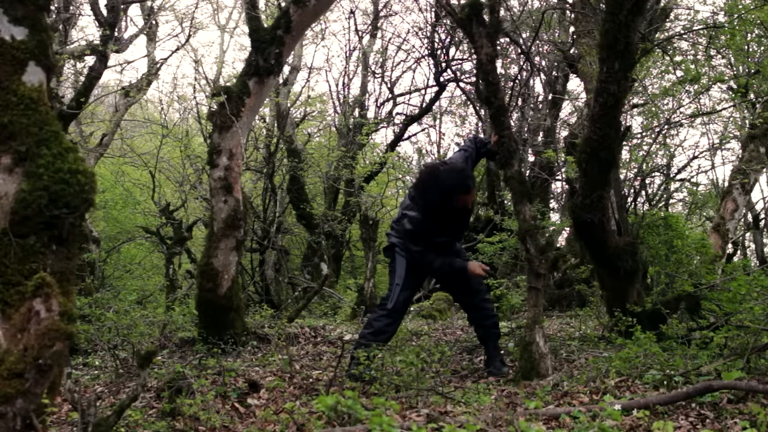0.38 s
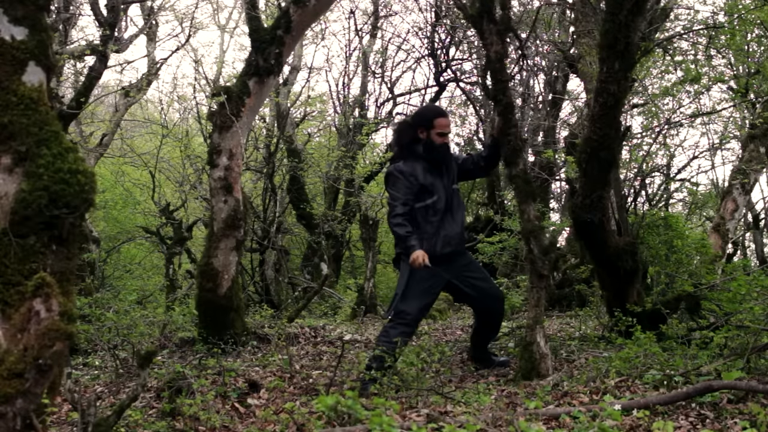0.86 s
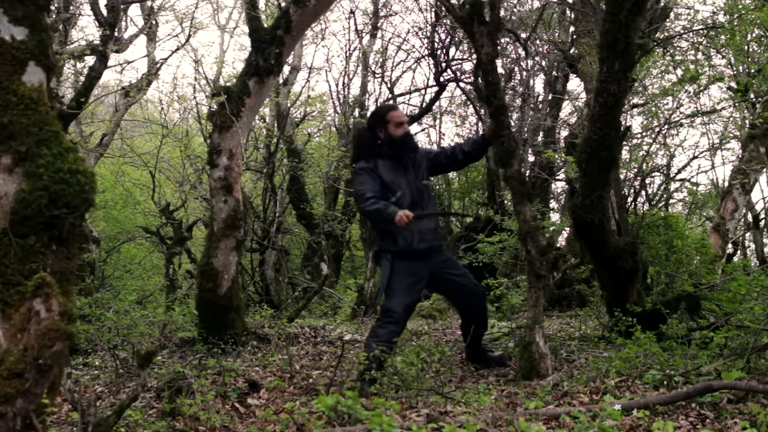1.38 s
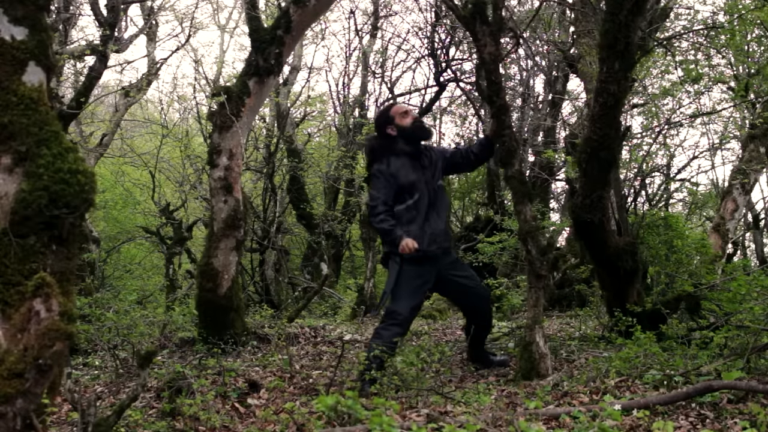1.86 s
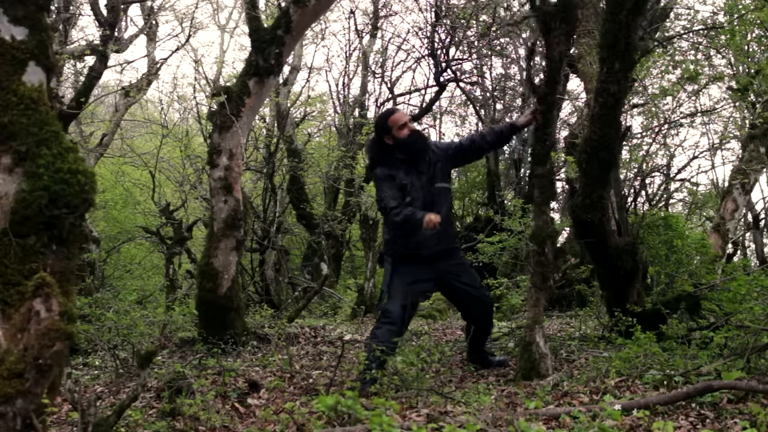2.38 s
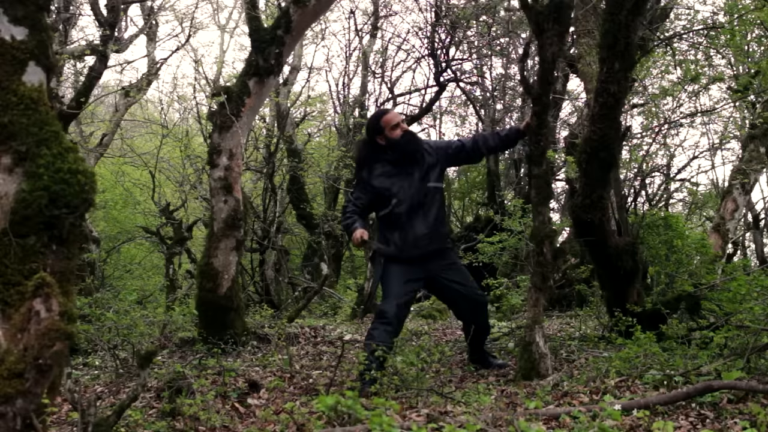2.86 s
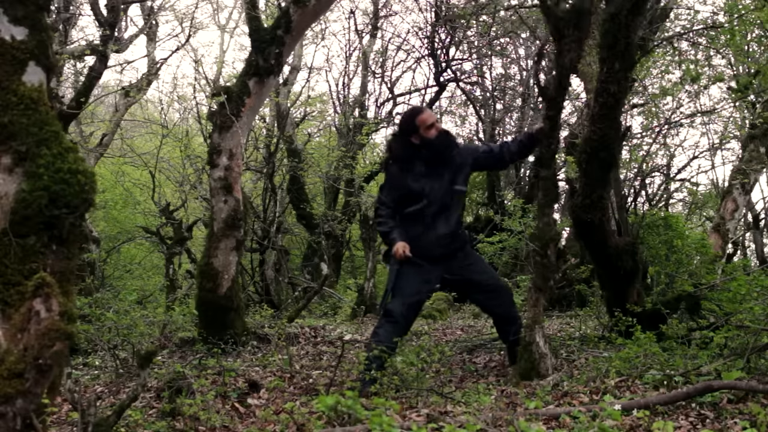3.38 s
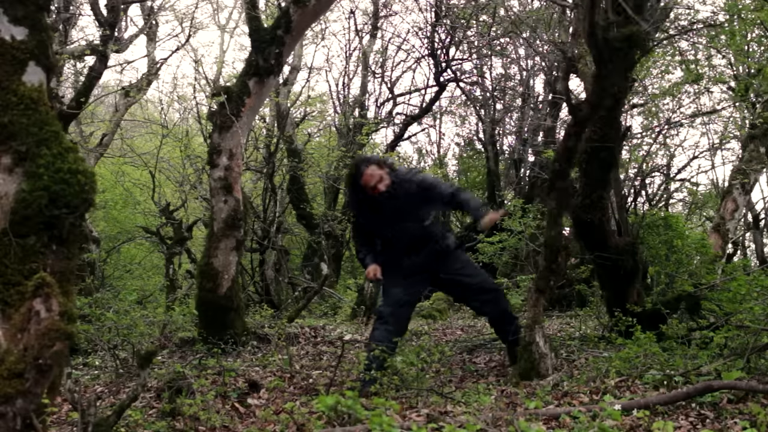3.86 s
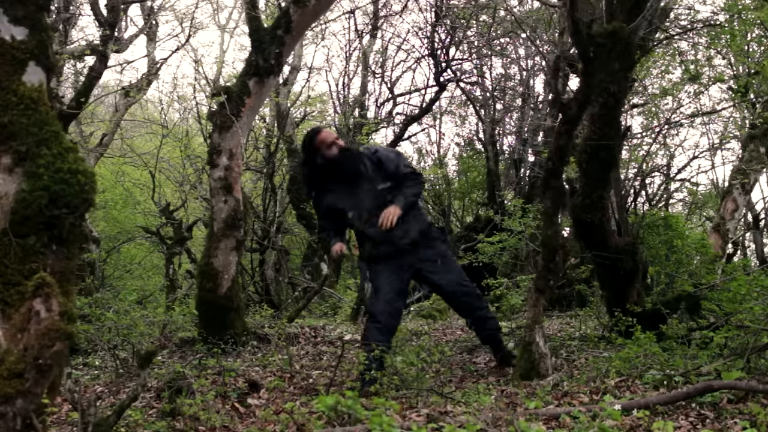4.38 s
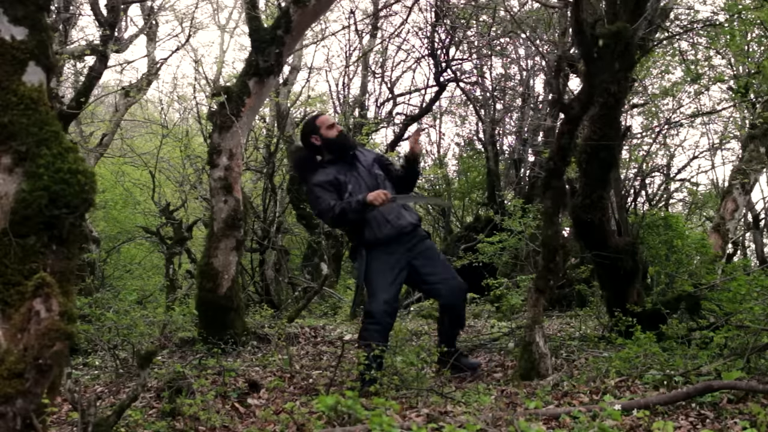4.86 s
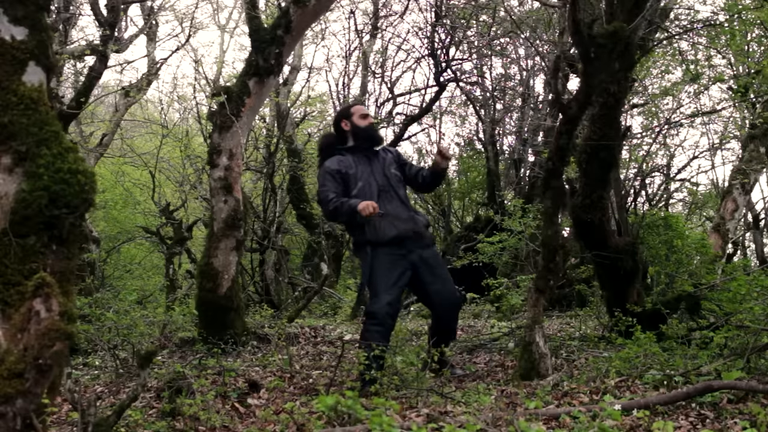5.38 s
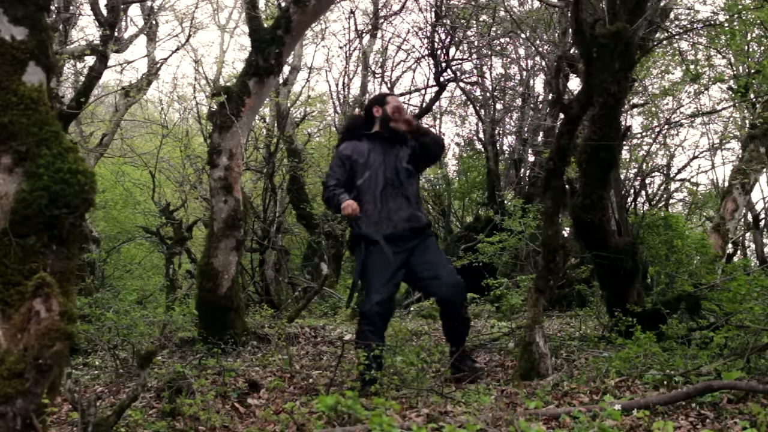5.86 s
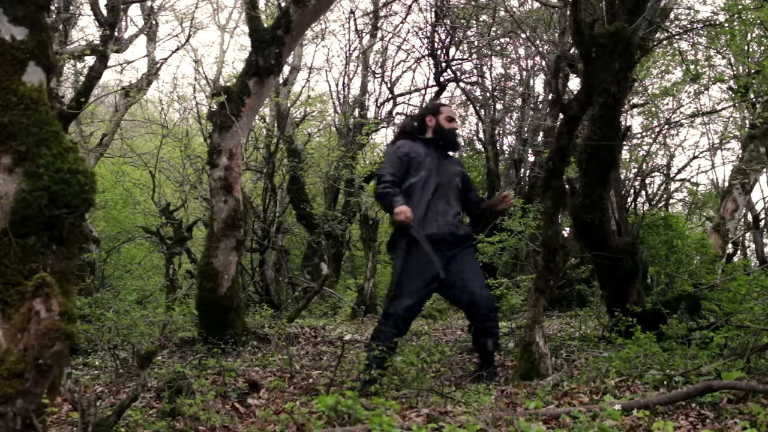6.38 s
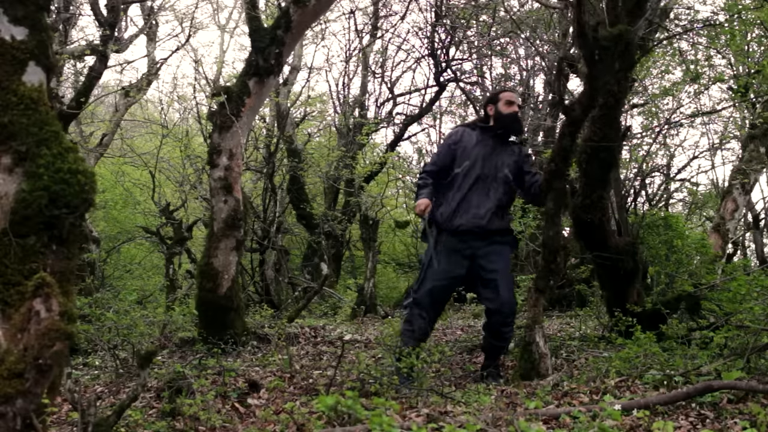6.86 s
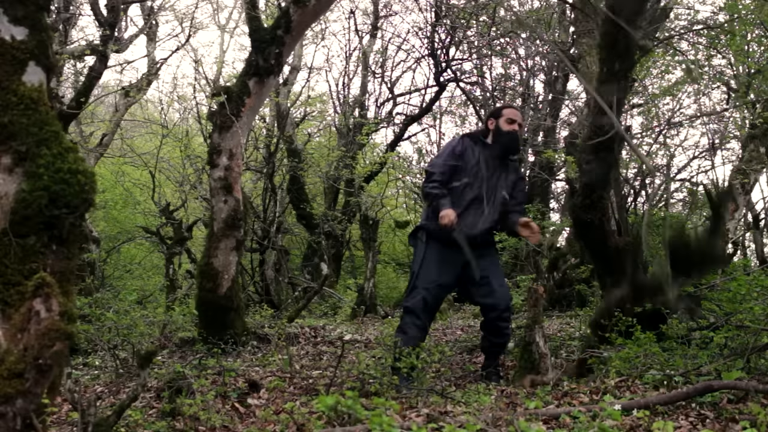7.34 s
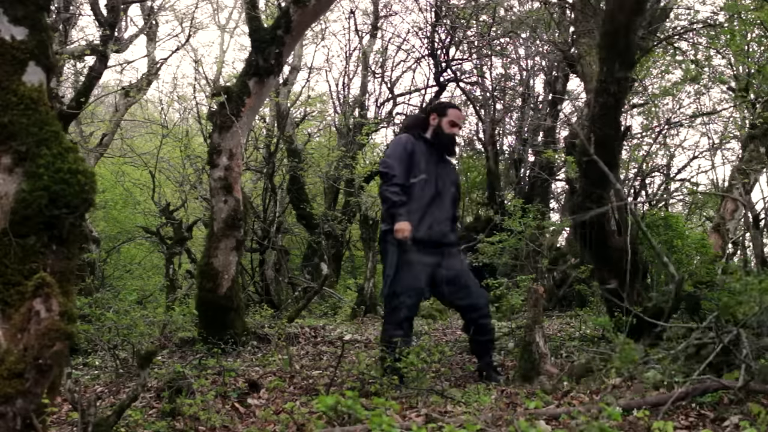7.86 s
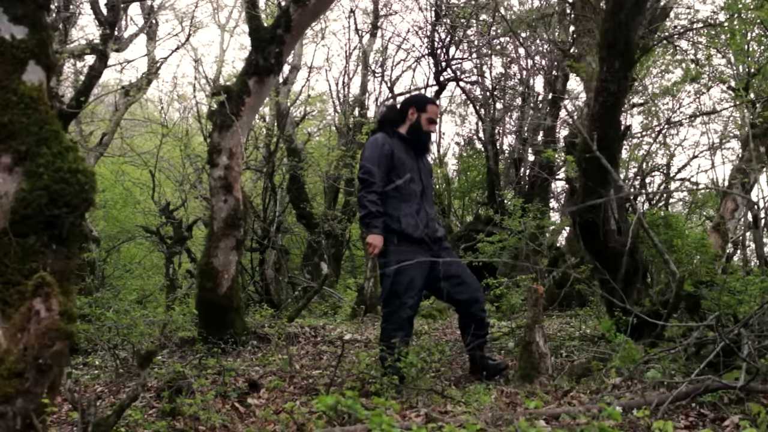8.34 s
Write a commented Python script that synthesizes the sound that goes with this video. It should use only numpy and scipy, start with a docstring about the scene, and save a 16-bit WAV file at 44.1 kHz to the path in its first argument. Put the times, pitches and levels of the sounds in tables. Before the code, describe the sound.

In a quiet wood, a small saw rasps through quick strokes and stops. A tight burst of loud dry cracks follows, then another, with twigs crackling between. After a quieter spell of faint ticks and rustling, the tree tears, snaps and falls through twigs with dull knocks. A stereo microphone stands some metres away, catching short trunk echoes.

```python
"""Felling a dead tree in a damp wood

A small hand saw finishes a cut, then a dead tree is wrenched, snaps in several goes and is pushed over.
Saw teeth are dense clicks through resonances; each break is a volley of tearing fibres and a bright spit.
Clumped grains make twig crackle and the rustle of leaves and bark; dying low noise makes thumps and knocks.
The trunks return a wash of noise echoes over a low far-off rumble; a stereo microphone stands metres away."""
import sys
import numpy as np
from scipy import signal
from scipy.io import wavfile

SR = 44100
rng = np.random.default_rng(int(sys.argv[2]) if len(sys.argv) > 2 else 0)


def dump(signal):
    """Clip the signal to [-1, 1] and save it as 16-bit WAV at the path in sys.argv[1]."""
    limited = np.clip(np.atleast_2d(signal).T, -1, 1)
    pcm = np.round(limited * 32767).astype(np.int16)
    wavfile.write(sys.argv[1], SR, pcm)


def invert_db(level):
    """Linear amplitude ratio for a level in decibels (20 dB per decade), elementwise."""
    return 10 ** (np.asarray(level, dtype=float) / 20)


N = 384993

# Breaks of the wood. Each row: start in seconds, knock level in dB, pitch of the piece in Hz,
# spit level in dB, time in seconds in which the tearing falls 60 dB.
BREAK_EVENTS = [(.9326, -37, 2240, -45, .02), (0.9524, -9.5, 1590, -27, 0.0072),
                (0.9697, -20, 1410, -13, .024), (0.9881, -11.5, 1400, -12, 0.022),
                (1.013, -3, 1170, -2, 0.03), (1.0324, -15, 1580, -16, .026), (1.0872, 2.5, 1500, 2, 0.016),
                (1.0977, -23, 1240, -3, 0.0069), (1.3461, -30.5, 1770, -26, 0.034),
                (1.402, -35, 1460, -35, 0.031), (1.5126, -26, 1360, -12.5, 0.015),
                (1.5662, -23, 2840, -32, 0.024), (1.5756, -33.5, 1040, -44, 0.06),
                (1.6238, -36.5, 2950, -31, .017), (1.679, -64, 1530, -35.5, .03),
                (1.8392, -40, 1870, -56, .039), (2.0336, -33, 2670, -31, 0.018),
                (2.04, -32, 2660, -54, .051), (2.256, -1, 1140, 3.3, 0.0092),
                (2.264, -0.5, 1650, 1, 0.0087), (2.2688, -6.5, 1740, -6, 0.036),
                (2.277, -9, 1480, -30, 0.035), (2.2838, -9.5, 1790, -23, 0.036),
                (2.2994, -11, 1740, -23, 0.053), (2.311, -6.5, 1030, -7, 0.025),
                (2.3227, -12, 1040, -10, .021), (2.3338, -11, 2090, -13, 0.01),
                (2.339, -8, 1660, -6, 0.043), (2.3744, 1.2, 1350, 1, 0.017), (2.3982, -22, 2740, -33, 0.02),
                (2.5164, -37, 1740, -20, .024), (2.616, -28, 4470, -32, .014),
                (2.651, -20, 3840, -43, 0.031), (2.7242, -33, 2050, -35, .027),
                (2.789, -32.5, 2580, -25, 0.056), (2.9536, -35, 1880, -22, 0.05),
                (2.971, -27.5, 2270, -23, 0.036), (3.03, -24, 2460, -40, 0.027),
                (3.1245, -34, 3920, -27, 0.034), (3.1965, -35, 3880, -19, 0.049),
                (3.2185, -42, 2800, -16, 0.0086), (3.2753, -31, 3940, -39, 0.018),
                (3.354, -32.5, 695, -53, 0.077), (3.4257, -7.5, 1490, -29, 0.0079),
                (3.4363, -14, 2530, -47, 0.011), (3.4834, -22.5, 1270, -35, 0.059),
                (3.584, -26, 2330, -20.5, 0.064), (3.624, -40, 3060, -13.5, .016),
                (3.638, -30, 2610, -6.5, .018), (3.6512, -15.5, 4000, -13, 0.027),
                (3.6717, -27, 1850, -13, 0.037), (3.7103, -25, 2240, -13, 0.034),
                (3.766, -24, 2610, -20, 0.046), (3.8169, -19, 1690, -32, 0.044),
                (3.827, -11.5, 1920, -12, 0.093), (3.9244, -52, 1850, -26, .017),
                (4.033, -50, 2610, -46, .017), (4.135, -43, 1720, -33, .033),
                (4.463, -35.5, 1200, -54, .031), (4.561, -65, 1590, -33, .03),
                (4.6149, -40, 3400, -29, .017), (4.65, -38, 1100, -53, 0.074),
                (4.711, -39, 1800, -52, .013), (4.979, -34.5, 3600, -45, 0.014),
                (5.0486, -33, 3060, -37, .018), (5.2732, -66, 1560, -38, .016),
                (5.3707, -41, 1840, -64, .018), (5.569, -44.5, 1460, -42, .016),
                (5.612, -30.5, 1780, -14.5, .014), (5.663, -49, 3340, -38, .025),
                (5.7973, -55, 3100, -36, .03), (5.8396, -31.5, 2690, -51, .016),
                (5.861, -32.5, 3120, -32.5, .027), (5.944, -32.5, 975, -39, 0.0092),
                (6.099, -46, 2500, -41, .044), (6.941, -44, 1690, -49, 0.023),
                (7.0006, -21.5, 3620, -17, .057), (7.1124, -19, 3010, -19, 0.16),
                (7.195, -16, 2170, -27, 0.17), (7.258, -22, 2130, -13, 0.031),
                (7.3374, -34, 1700, -19, .019), (7.356, -30, 3380, -34, .013),
                (7.4031, -19, 1050, -31, .038), (7.4205, -0.5, 1840, 0, 0.037),
                (7.4654, -17, 2600, -10, 0.066), (7.4984, -20, 1950, -24, 0.064),
                (7.5021, -12.5, 2430, -10, 0.073), (7.5207, -26, 3530, -8, .021),
                (7.5337, -12.5, 4180, -20, 0.044), (7.5977, -3.5, 2280, -21, .032),
                (7.61, -3, 3270, -17, .033), (7.626, -21, 1110, -9, 0.03), (7.6474, -8, 4100, -5, .033),
                (7.698, -12, 1940, -30, 0.026), (7.799, -23, 1500, -19, 0.042),
                (7.8178, -15, 1940, -23, 0.024), (7.964, -23.5, 2540, -23, 0.061),
                (8.073, -18, 2250, -47, 0.014), (8.21, -28.5, 3010, -22, 0.053),
                (8.259, -36, 3070, -21, 0.039), (8.3221, -27, 3160, -5.5, 0.0056),
                (8.3457, 3, 2570, -1.5, 0.024), (8.348, -6.5, 1330, -13, 0.018),
                (8.3733, -26, 564, -29, 0.013), (8.4947, -24, 580, -21, 0.038),
                (8.584, -19, 3070, -7.5, 0.043), (8.597, -12, 2770, -9, 0.024),
                (8.618, -5.5, 2360, -15, 0.019)]


def rms_one(x):
    """Scale to rms 1."""
    return x / np.sqrt(np.mean(x ** 2) + 1e-20)


def in_time(points):
    """Read a curve of (seconds, value) rows at every sample."""
    seconds, values = np.transpose(points)
    return np.interp(np.arange(N) / SR, seconds, values)


def at_hz(points, hz):
    """Read a curve of (Hz, value) rows on a log-frequency axis."""
    points_hz, values = np.transpose(points)
    return np.interp(np.log(hz), np.log(points_hz), values)


def drift(rate_hz):
    """Random wander of rms 1: noise smoothed by two equal poles at rate_hz, made at SR / 40."""
    pole = np.exp(-80 * np.pi * rate_hz / SR)
    noise = rng.standard_normal(N // 40 + 2002)
    slow = signal.lfilter([1], [1, -2 * pole, pole * pole], noise)[2000:]
    return np.interp(np.arange(N) / 40, np.arange(len(slow)), rms_one(slow))


def resonance(x, hz, width_hz):
    """Two-pole band-pass, gain about 1 on top."""
    radius = np.exp(-np.pi * width_hz / SR)
    numerator = np.array([1, 0, -1]) * (1 - radius * radius) / 2
    denominator = [1, -2 * radius * np.cos(2 * np.pi * hz / SR), radius * radius]
    return signal.lfilter(numerator, denominator, x + 1e-18)


def clicks(per_s, spread_db):
    """Clicks at random moments, most small, a few large; mean power about 1."""
    sizes = invert_db(spread_db * np.minimum(rng.exponential(1, N), 5)) * rng.choice([-1, 1], N)
    happens = rng.random(N) < per_s / SR
    return happens * rms_one(sizes) * np.sqrt(SR / per_s)


def sides(pan_db):
    """Left and right gains that differ by pan_db; above 0 favours the left."""
    return invert_db(np.array([[.5], [-.5]]) * pan_db)


def spread_stereo(mid, side, alike):
    """Two noises of equal power become left and right with the correlation alike."""
    return np.sqrt(1 + alike) * mid + np.sqrt(1 - alike) * side * [[1], [-1]]


def bands(low_hz, count):
    """Half-octave band-passes with their centres."""
    edges = low_hz * 2 ** (np.arange(count + 1) / 2)
    return [(np.sqrt(a * b), signal.butter(2, [a, b], "band", fs=SR, output="sos"))
            for a, b in zip(edges, edges[1:])]


def air(patchy_db=3.5, calm_hz=300):
    """Far rumble and faint hiss of the canopy: noise wavering band by band, steadier in the treble."""
    # Each row: frequency in Hz, relative level in dB per Hz.
    air_spectrum = [(13, -45), (22, -25), (61, -6), (115, 1), (211, -11), (356, -11.5), (510, -13.5),
                    (618, -15), (1270, -18), (2320, -23), (3150, -22.5), (7600, -25.5), (13200, -39),
                    (16000, -40)]
    # Each row: frequency in Hz, left-right correlation.
    likeness = [(30, 1), (150, 0.92), (400, 0.067), (1500, 0.23), (5000, 0.17), (14000, 0.17)]
    white = rng.standard_normal((2, 2, N + 8000))
    out = 0
    for k, (hz, sos) in enumerate(bands(20.6, count=19)):
        mid, side = signal.sosfilt(sos, white[k % 2])[:, 8000:]     # drop the filter's start
        waver_db = patchy_db * min(1, (calm_hz / hz) ** .25) * drift(9)
        gain = invert_db(at_hz(air_spectrum, hz) + waver_db)
        out = out + gain * spread_stereo(mid, side, at_hz(likeness, hz))
    return invert_db(-55.5) * rms_one(out)


def wood(x, build_s=0.0009, alike=0.68):
    """Countless trunk echoes: noise that builds up and dies band by band, partly different on each side."""
    # Each row: frequency in Hz, time in seconds in which the echoes fall 60 dB.
    echo_t60 = [(200, 0.52), (700, 0.51), (1500, 0.54), (4000, 0.62), (9000, 0.52), (15000, 0.13)]
    t = np.arange(SR) / SR
    mid_side = np.zeros((2, SR))
    for hz, sos in bands(165.0, count=13):
        noise = signal.sosfilt(sos, rng.standard_normal((2, SR)))
        mid_side += noise * invert_db(-60 * t / at_hz(echo_t60, hz))
    echoes = spread_stereo(*mid_side, alike) * (1 - np.exp(-t / build_s))
    return signal.fftconvolve(x[None], rms_one(echoes) / np.sqrt(SR), axes=1)[:, :N]


def thumps(rise_s=0.00057):
    """Dull lumpy thumps and low knocks of trunk and limbs: dying noise, twice through a wide resonance."""
    # Trunk and limbs knocking together and thumping the soft ground. Each row: start in seconds,
    # peak in dB, pitch in Hz, time in seconds in which the noise falls 60 dB.
    thump_events = [(1.015, -35.5, 128, 0.11), (1.089, -49, 138, 0.11), (2.257, -32.5, 150, 0.048),
                    (2.377, -38, 130, 0.12), (5.922, -53, 246, 0.12), (5.995, -49, 780, 0.054),
                    (6.525, -48, 775, .05), (7.403, -27.5, 171, 0.077), (7.2, -27, 645, 0.19),
                    (7.25, -29.5, 530, 0.035), (7.59, -28.5, 260, 0.17), (7.61, -35, 130, 0.23),
                    (7.68, -30.5, 620, 0.064), (8.06, -46, 96, 1), (8.345, -7.5, 630, 0.025),
                    (8.38, -38, 57.4, 0.57), (8.359, -31, 119, .4), (8.409, -30, 220, 0.16),
                    (8.466, -20.5, 533, 0.065), (8.47, -20.5, 397, 0.055), (8.467, -26.5, 256, 0.066),
                    (8.483, -33.5, 152, 0.34), (8.617, -22, 620, 0.048)]
    out, t = np.zeros((2, N + 12000)), np.arange(12000) / SR
    for start_s, peak_db, hz, t60 in thump_events:
        noise = rng.standard_normal((3, len(t))) * invert_db(-60 * t / t60) * (1 - np.exp(-t / rise_s))
        both_sides = noise[0] + 0.27 * noise[1:]      # shared noise, a little different left and right
        lump = resonance(resonance(both_sides, hz, hz), hz, hz)
        at = round(start_s * SR)
        out[:, at:at + len(t)] += invert_db(peak_db) * lump / np.abs(lump).max()
    return out[:, :N]


def shower(column, under_db, share, t60):
    """Power of debris that starts with each break, passes on a share of its dB and falls 60 dB in t60."""
    rows, starts = np.array(BREAK_EVENTS), np.zeros(N)
    starts[(rows[:, 0] * SR).astype(int)] = invert_db(under_db + share * rows[:, column]) ** 2
    return signal.lfilter([1], [1, -invert_db(-60 / (t60 * SR)) ** 2], starts + 1e-18)


def grains(spectrum, per_s, spread_db, sharpness, clump_db, wide_db, tilt_db=0, count=12):
    """Clumped clicks dealt to short resonators across the spectrum, each from its own side; rms 1."""
    train = clicks(per_s, spread_db) * invert_db(clump_db * drift(23.8))
    dealt = rng.integers(0, count, N)
    train = train * sides(wide_db * np.clip(rng.standard_normal(N), -2.5, 2.5))
    out = 0
    for k, hz in enumerate(np.geomspace(spectrum[1][0], spectrum[-2][0], count)):
        # each size of twig or leaf comes in its own flurries
        patch_db = at_hz(spectrum, hz) + tilt_db * np.log2(hz / 1600) + clump_db * drift(30)
        out = out + resonance(invert_db(patch_db) * train * (dealt == k), hz, hz / sharpness)
    return rms_one(out)


def undergrowth(swell_share=0.98, swell_firmness=1.3, ebb_share=1.38):
    """Twigs crackle in the middle range, leaves and bark flakes rustle above; heaves and showers add up."""
    # Each row: frequency in Hz, relative level in dB per Hz.
    twig_spectrum = [(150, -46), (250, -15.5), (601, -10), (651, -9), (884, -2.5), (2460, -4.5),
                     (2890, -2.5), (3340, -16.5), (6000, -12.5), (7800, -29), (13200, -120)]
    # Each row: frequency in Hz, relative level in dB per Hz.
    leaf_spectrum = [(1470, -29), (2500, -1.5), (2900, -8), (3360, -10), (7300, -5), (14000, -13),
                     (16000, -26)]
    # How thick the tearing wood is. Each row: time in seconds, tilt of the crackle in dB per octave.
    girth = [(.9, -2.5), (1.3, 0.5), (1.6, -2.5), (2.2, -6), (2.5, 1), (2.8, 4.7), (3.43, -1.5), (3.6, 1),
             (7.0, 1.3), (8.3, 1), (8.73, 0.5)]
    # Heaves on the tree. Each row: peak time in seconds, twig crackle in dB,
    # leaves above twigs in dB, length in seconds.
    heaves = [(.02, -88, 27, 0.77), (0.99, -42, -1.5, 0.048), (1.39, -50, -2, 0.27), (1.86, -80, -5, 0.097),
              (2.309, -27, -5, 0.046), (2.544, -44, -1, 0.23), (2.785, -48.5, -3, 0.14),
              (2.975, -51, 5.5, 0.18), (3.292, -58, 11, 0.065), (3.657, -36.5, 0.5, 0.24),
              (3.822, -31, -13, 0.028), (4.008, -47, -0.5, 0.073), (4.19, -59, -6, .2),
              (4.37, -57.5, 0, 0.22), (4.632, -53.5, -2, 0.077), (4.75, -60, 1.5, 0.33),
              (5.07, -62.5, 4, 0.26), (5.305, -66, -8, 0.063), (5.63, -64, 8, 0.039),
              (5.872, -55.5, -2.5, 0.08), (6.117, -69, 5, 0.046), (6.243, -59, -1, 0.09),
              (6.766, -64, -17, 0.22), (6.967, -52, -12, 0.026), (7.023, -37, -2.5, 0.061),
              (7.063, -34.5, -10, 0.064), (7.13, -33.5, -7, 0.11), (7.215, -35.5, -0.5, 0.27),
              (7.424, -31, 8, 0.023), (7.529, -32, 3.5, 0.17), (7.604, -24.5, -7, 0.1),
              (7.905, -48, 2, 0.75), (8.284, -66.5, 14, 0.2), (8.397, -38, -11, 0.037),
              (8.444, -31, -13, 0.11), (8.63, -41.5, -14, 0.27)]
    t = np.arange(N) / SR
    twig_power = shower(1, under_db=-34, share=0.77, t60=0.33)      # follows the knocks
    leaf_power = shower(3, under_db=-45.5, share=0.8, t60=0.95)     # follows the spits
    for peak_s, twig_db, leaf_db, length_s in heaves:
        # a heave gains and loses 20 dB in these shares of its length; it sets in late and firmly
        swell = (np.abs(peak_s - t) / (swell_share * length_s)) ** swell_firmness
        ebb = (t - peak_s) / (ebb_share * length_s)
        heave = invert_db(twig_db - 20 * np.where(t < peak_s, swell, ebb)) ** 2
        twig_power = twig_power + heave
        leaf_power = leaf_power + heave * invert_db(leaf_db) ** 2
    twigs = grains(twig_spectrum, 3600, spread_db=3.3, sharpness=3.0, clump_db=1.8, wide_db=5.0,
                   tilt_db=in_time(girth))
    leaves = grains(leaf_spectrum, 7000, spread_db=3.0, sharpness=2.5, clump_db=1.5, wide_db=9.0)
    return np.sqrt(twig_power) * twigs + np.sqrt(leaf_power) * leaves


def saw(stop_s=.877, bite=1.9):
    """Teeth bite densely and unevenly into the wood; the stem rings; the last stroke stops dead."""
    # What the sawn stem and blade ring with. Each row: frequency in Hz, width in Hz, gain in dB.
    saw_body = [(810, 200, -10.5), (1360, 157, -1), (1780, 130, -2.5), (2150, 280, -8.5), (2740, 320, -7),
                (3800, 810, -14), (7140, 2050, -12.5), (11900, 10000, -23)]
    # Saw strokes. Each row: middle in seconds, level at the middle in dB, length in seconds.
    strokes = [(0.017, -42.5, 0.17), (.2, -48.5, 0.21), (0.357, -42.5, .17), (.545, -45, 0.16),
               (0.696, -44, .2), (0.873, -45.5, .14)]
    t, level = np.arange(N) / SR, 0
    for middle_s, db, length_s in strokes:
        blade_speed = np.abs(np.cos(np.pi * np.clip((t - middle_s) / length_s, -.5, .5)))
        level = level + invert_db(db) * blade_speed ** bite       # loudness grows as this power of the speed
    bites = clicks(3000, spread_db=2.5) * invert_db(2.0 * drift(60))
    ringing = 0
    for k, (hz, width_hz, db) in enumerate(saw_body):
        ringing = ringing + (-1) ** k * invert_db(db) * resonance(bites, hz, width_hz)
    return rms_one(ringing) * level * (t < stop_s)


def breaks(fibres_per_s=5000, knock_lag_s=.0002, spit_share=0.59, scatter_db=3.0, spit_alike=0.23):
    """Fibres tear in a volley that dies away; it knocks the damped piece and spits bright splinters."""
    # Modes of a broken piece. Each row: multiple of its pitch, gain in dB,
    # sharpness (frequency over width, held to 3 at most below).
    piece_modes = [(.62, 1.5, 0.82), (1.01, 15.5, 7.8), (1.5, -1.5, 4.9), (2.2, -11.5, 7.4),
                   (3.199, -35.5, 2.5)]
    out, t = np.zeros((2, N + 2600)), np.arange(2600) / SR
    thin = signal.butter(5, 620, "high", fs=SR, output="sos")     # slim branches radiate no bass
    lag = round(knock_lag_s * SR)
    for start_s, knock_db, hz, spit_db, t60 in BREAK_EVENTS:
        chance = rng.standard_normal((2, len(piece_modes)))
        noise = rng.standard_normal((4, len(t)))
        tears = rng.random(len(t)) < fibres_per_s / SR
        volley = noise[0] * tears * invert_db(-3 - 60 * (t / t60) ** 1.2)
        volley[0] = -2.0     # the main fracture comes first
        knock = 0
        for (times, db, sharpness), luck in zip(piece_modes, chance[0]):
            mode_hz = hz * times
            mode = resonance(volley, mode_hz, mode_hz / min(sharpness, 3))
            knock = knock + invert_db(db + 2.5 * luck) * mode
        knock = np.pad(signal.sosfilt(thin, knock), (lag, 0))[:len(t)]

        # the more a break spits rather than knocks, the finer and higher its splinters, up to a limit
        spit_hz = 6070 * 2 ** (0.41 * np.tanh((spit_db - knock_db) / 7))
        hiss = np.sqrt(spit_alike) * noise[1] + np.sqrt(1 - spit_alike) * noise[2:]
        hiss = hiss * invert_db(-60 * t / (spit_share * t60))
        splinters = resonance(resonance(hiss, spit_hz, spit_hz * .6), spit_hz, spit_hz * .6)
        sparkle = 0.21 * min(1, invert_db(knock_db - spit_db)) ** 0.51
        spit = splinters + sparkle * resonance(hiss, 10000, 5400)

        crack = invert_db(knock_db - 3.0) * knock / np.abs(knock).max()
        crack = crack + invert_db(spit_db - 7.0) * spit / np.abs(spit).max()
        at = round(start_s * SR)
        out[:, at:at + len(t)] += crack * sides(scatter_db * chance[1, 0])
    return out[:, :N]


def scene():
    """All sources, a dull bounce off the ground, the echoes of the wood and the air."""
    # Where the work is, ahead of the final balance. Each row: time in seconds, left over right in dB.
    bearing = [(0, 2.7), (6.9, 0.5), (7.7, 0.5), (8.5, 0.5), (8.73, -1.5)]
    near = (saw() + breaks() + undergrowth() + thumps()) * sides(in_time(bearing))
    lag = round(0.001538 * SR)      # the ground path arrives 1.538 ms later
    bounce = signal.lfilter([.4], [1, -.6], np.pad(near, ((0, 0), (lag, 0)))[:, :N])
    echoes = wood(near.mean(axis=0))
    mix = near + invert_db(-17.5) * bounce + invert_db(-10.5) * echoes + air()
    return mix * sides(-1.4)        # a constant balance of 1.4 dB toward the right, added to the bearing


def band_limit(x):
    """A steep low-pass at the top of the band."""
    return signal.sosfilt(signal.butter(12, 16990, fs=SR, output="sos"), x)


def record(dry):
    """Peaks beyond full scale are clipped, then the top is cut steeply below 16.6 kHz."""
    low_pass = signal.cheby2(14, 60, 16600, fs=SR, output="sos")
    finished = signal.sosfilt(low_pass, np.clip(dry, -1, 1))
    return band_limit(finished)


dry = scene()
out = record(dry)
dump(out)
```